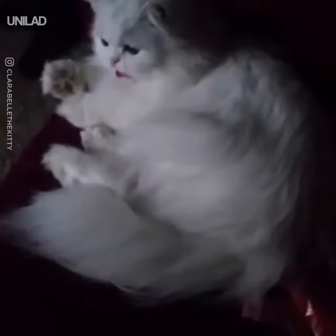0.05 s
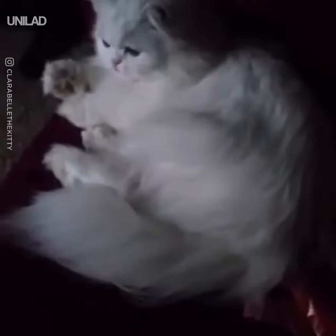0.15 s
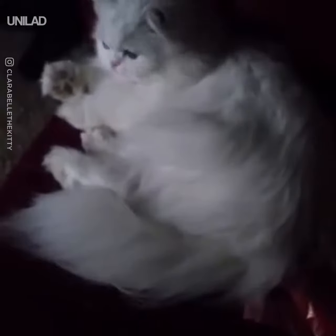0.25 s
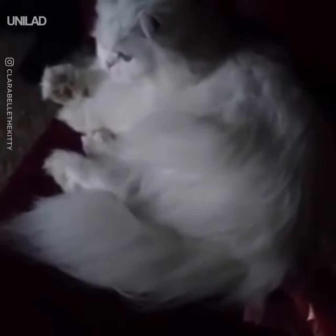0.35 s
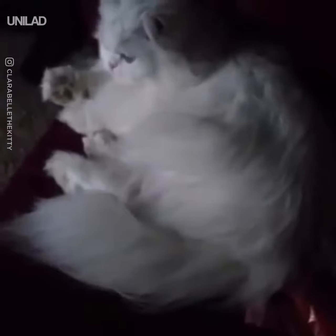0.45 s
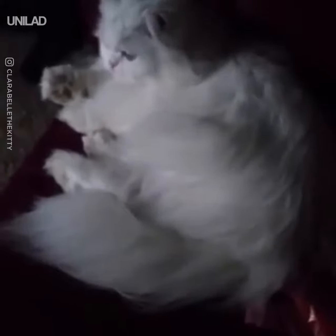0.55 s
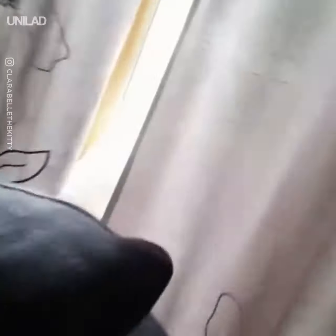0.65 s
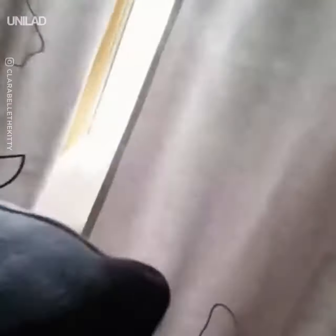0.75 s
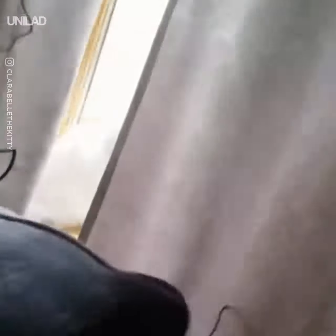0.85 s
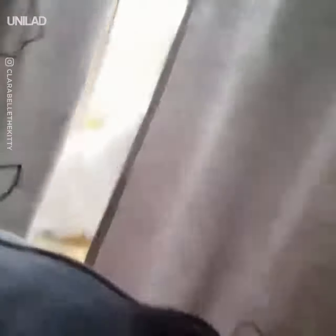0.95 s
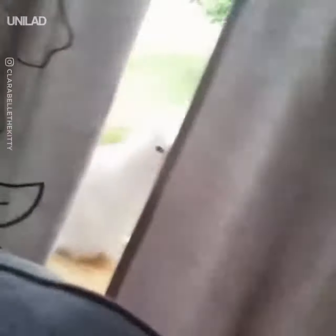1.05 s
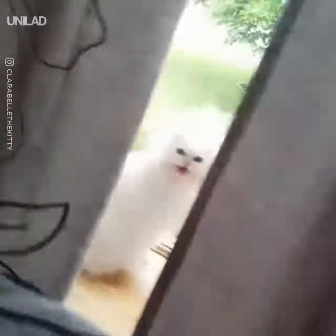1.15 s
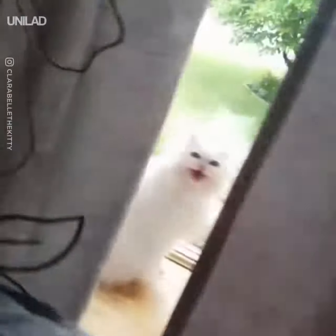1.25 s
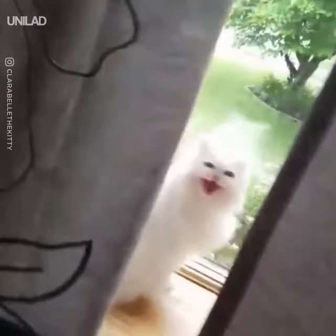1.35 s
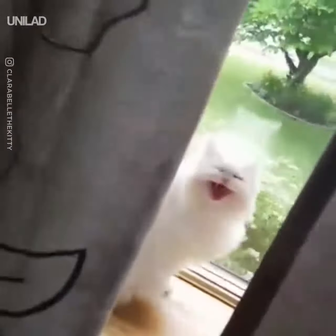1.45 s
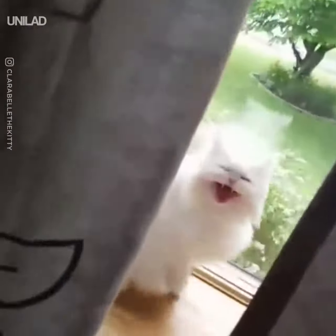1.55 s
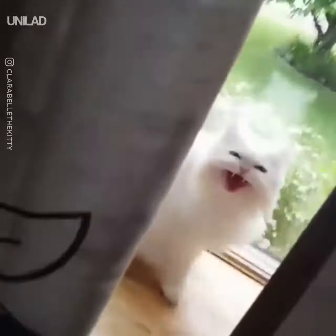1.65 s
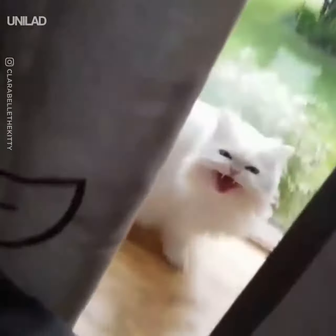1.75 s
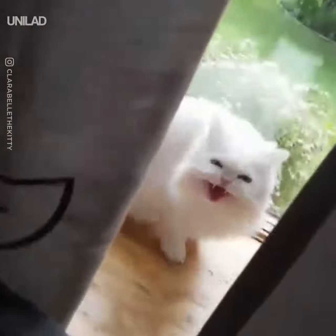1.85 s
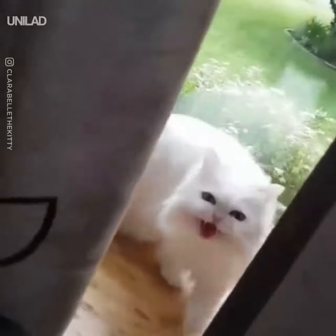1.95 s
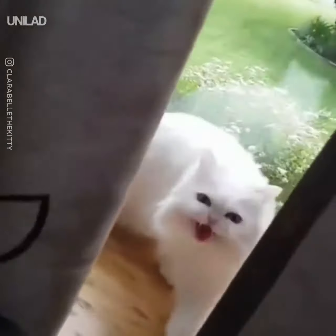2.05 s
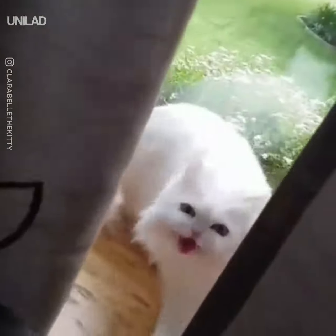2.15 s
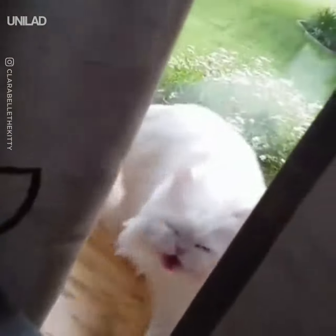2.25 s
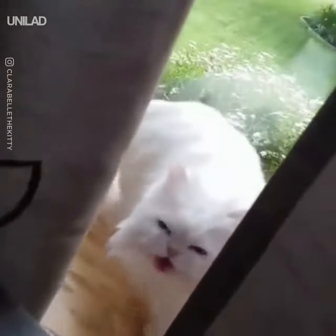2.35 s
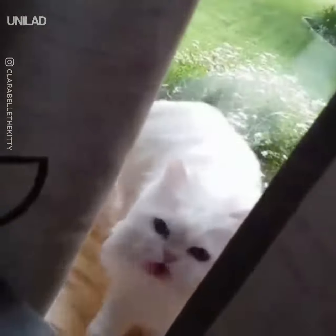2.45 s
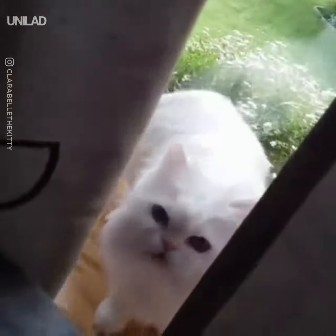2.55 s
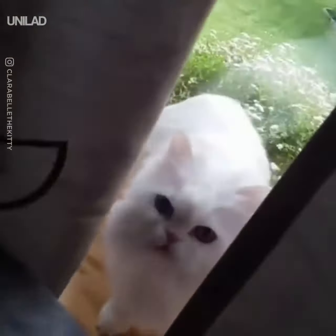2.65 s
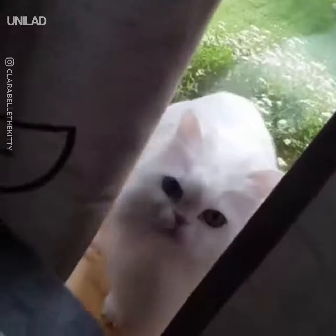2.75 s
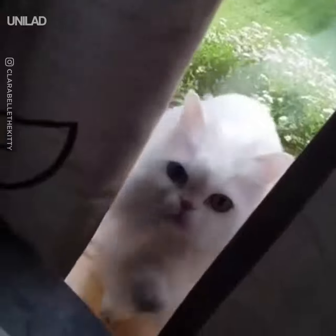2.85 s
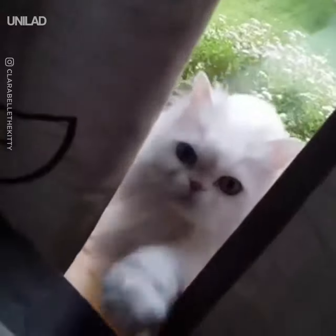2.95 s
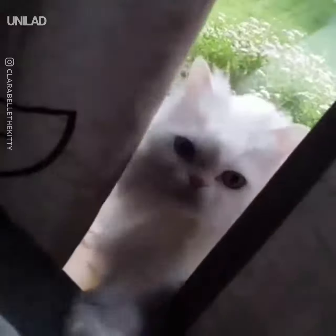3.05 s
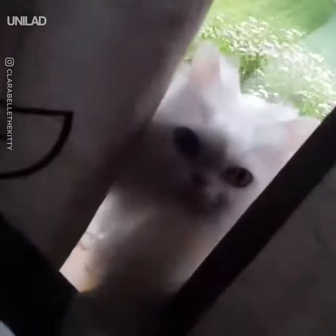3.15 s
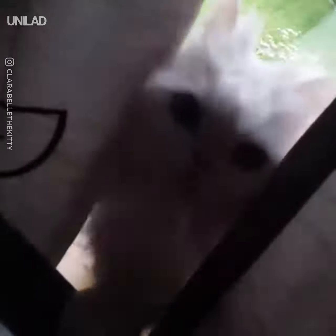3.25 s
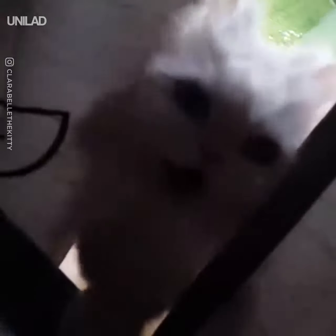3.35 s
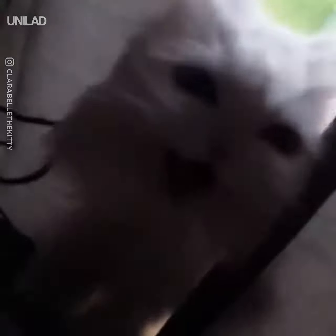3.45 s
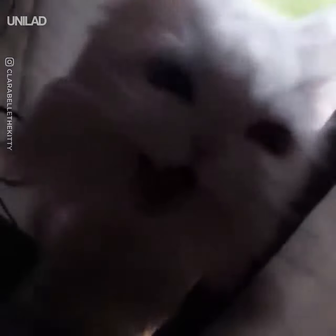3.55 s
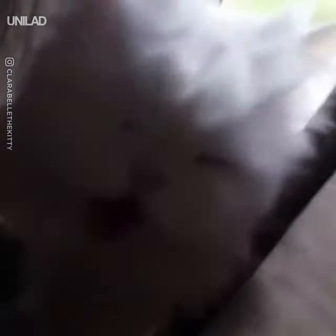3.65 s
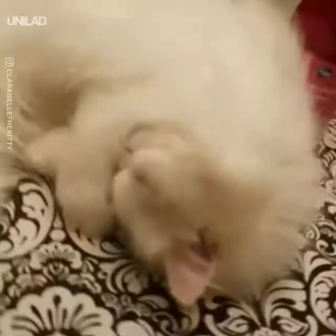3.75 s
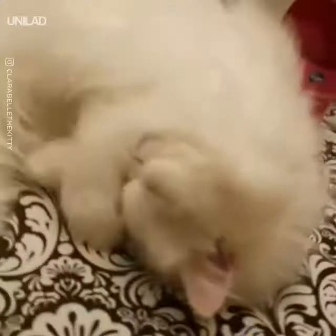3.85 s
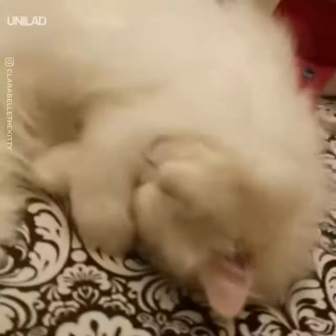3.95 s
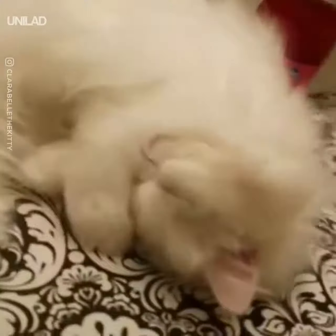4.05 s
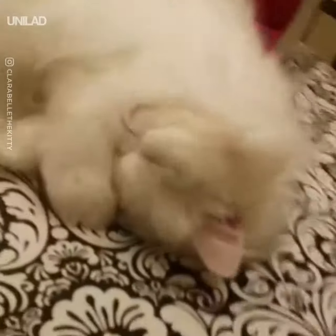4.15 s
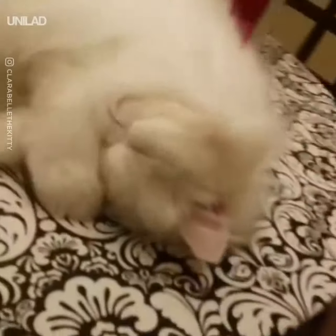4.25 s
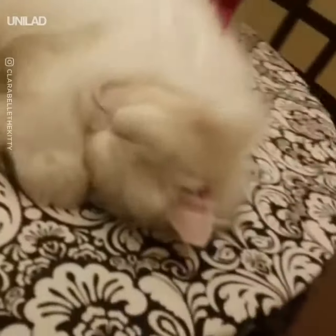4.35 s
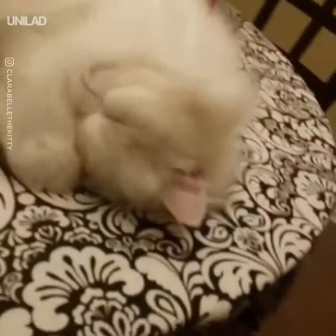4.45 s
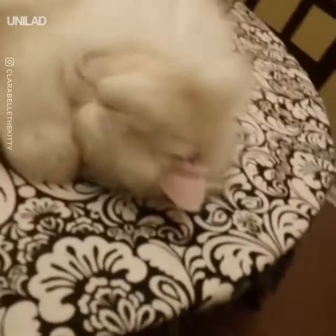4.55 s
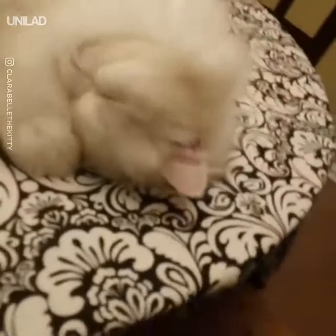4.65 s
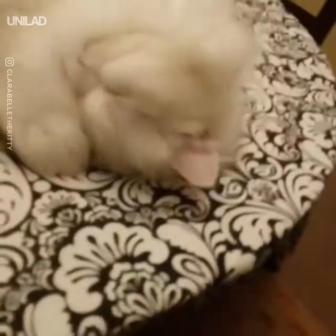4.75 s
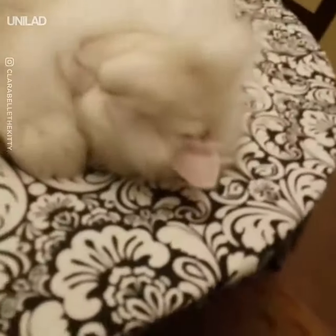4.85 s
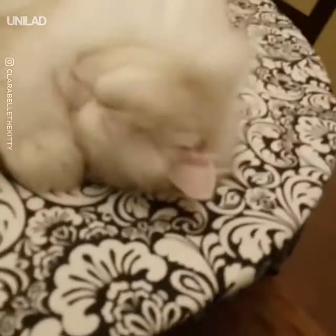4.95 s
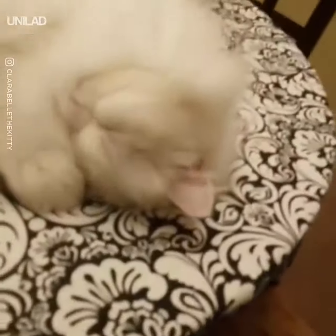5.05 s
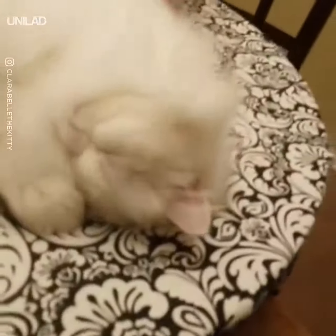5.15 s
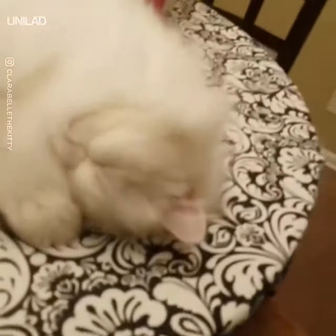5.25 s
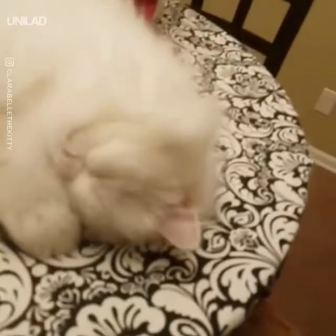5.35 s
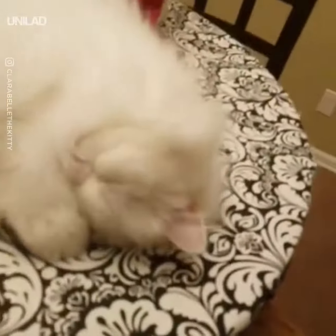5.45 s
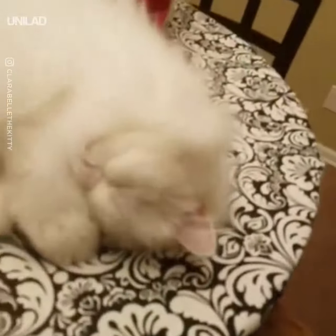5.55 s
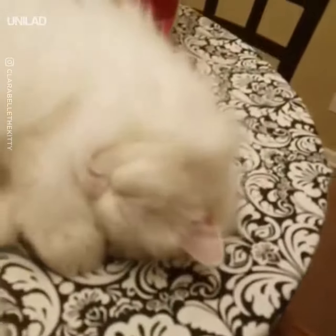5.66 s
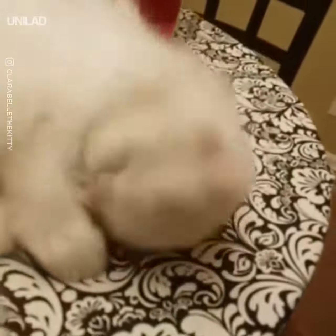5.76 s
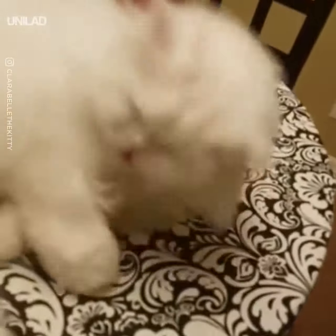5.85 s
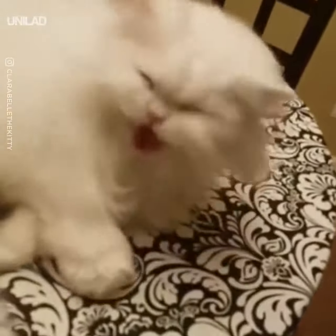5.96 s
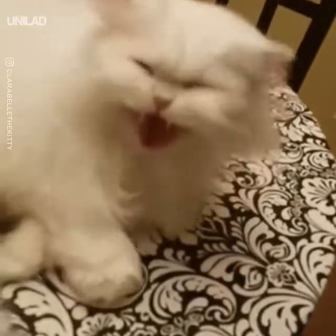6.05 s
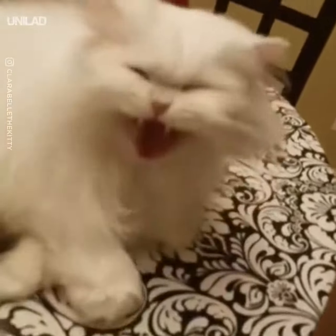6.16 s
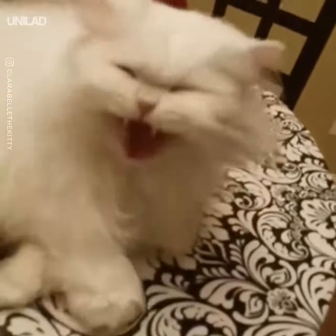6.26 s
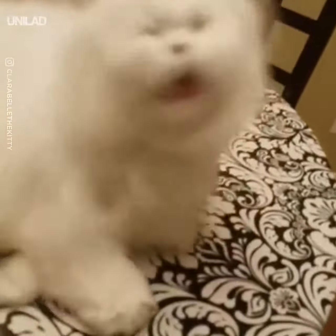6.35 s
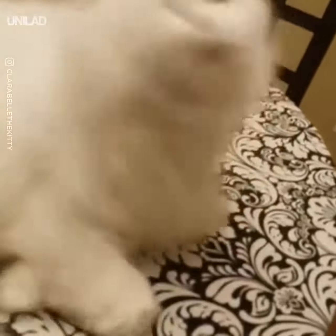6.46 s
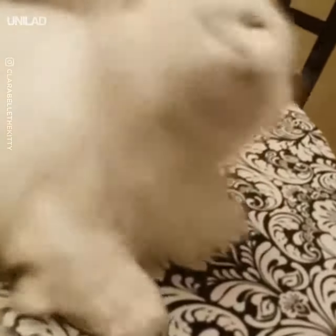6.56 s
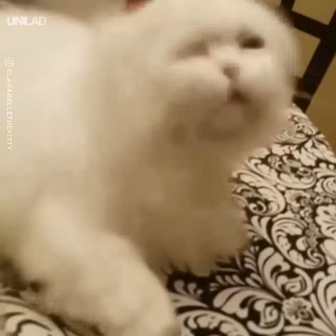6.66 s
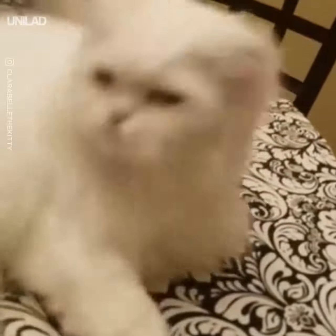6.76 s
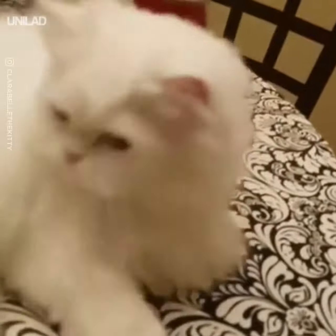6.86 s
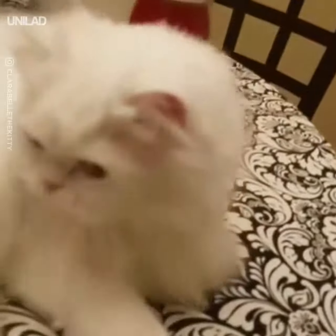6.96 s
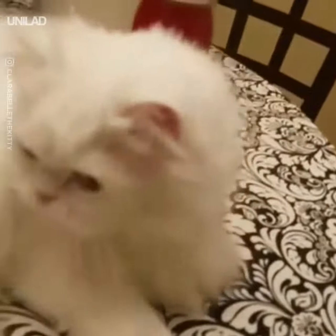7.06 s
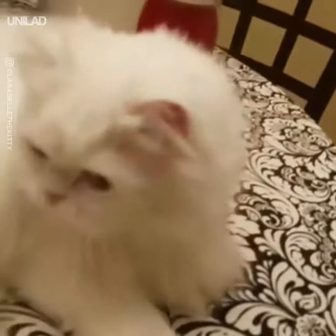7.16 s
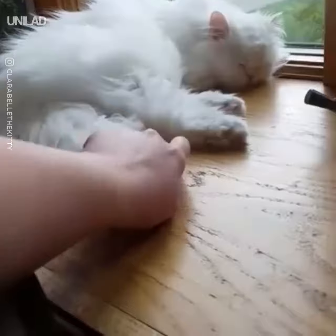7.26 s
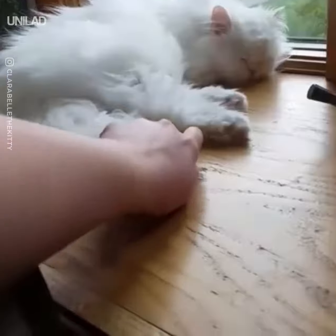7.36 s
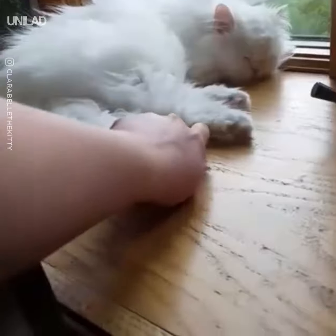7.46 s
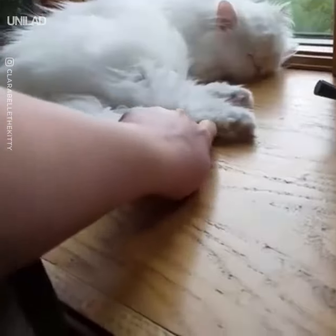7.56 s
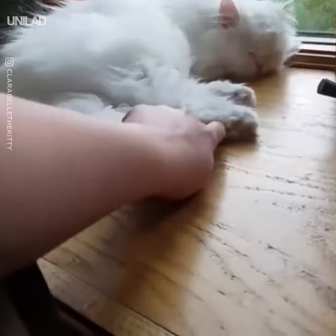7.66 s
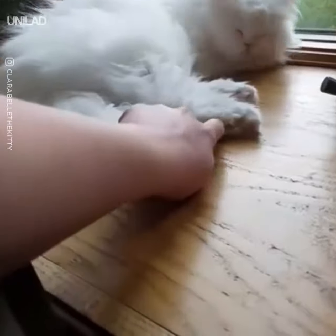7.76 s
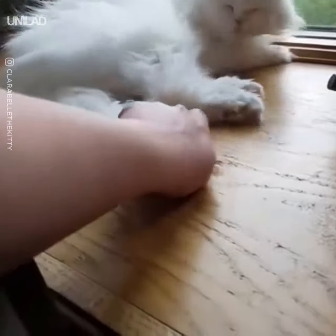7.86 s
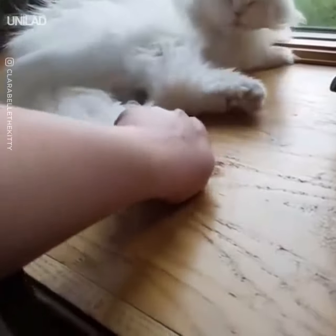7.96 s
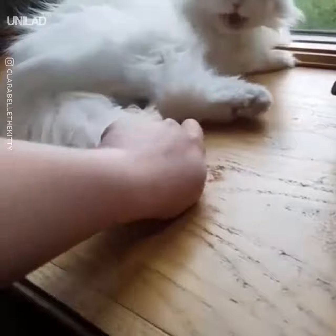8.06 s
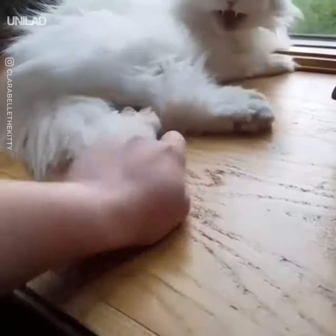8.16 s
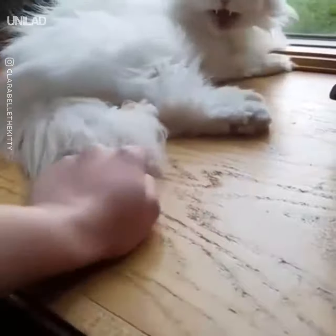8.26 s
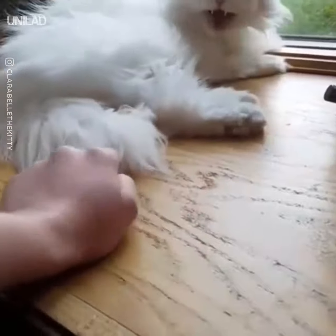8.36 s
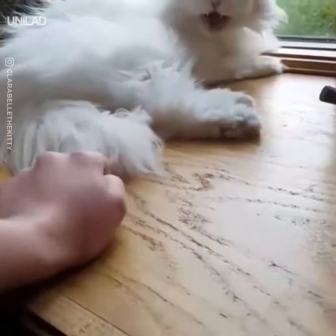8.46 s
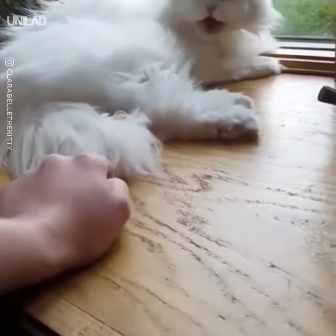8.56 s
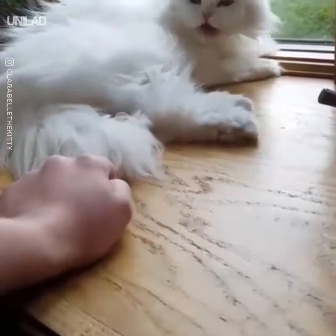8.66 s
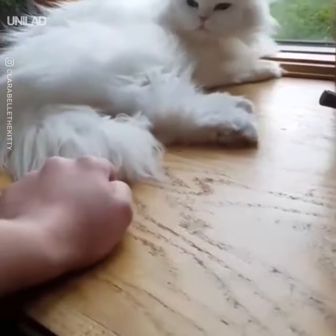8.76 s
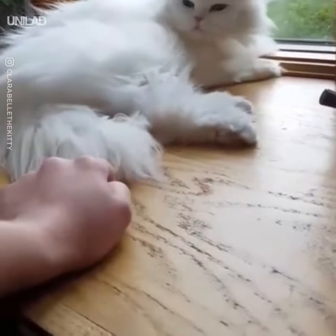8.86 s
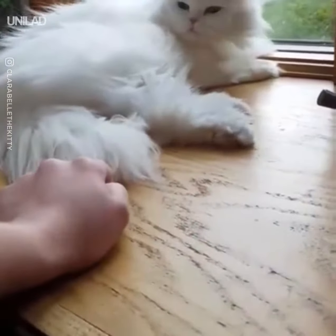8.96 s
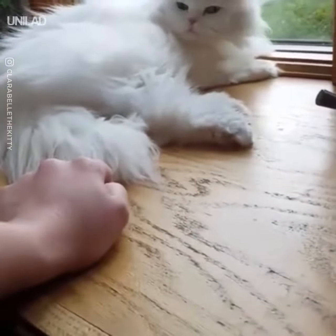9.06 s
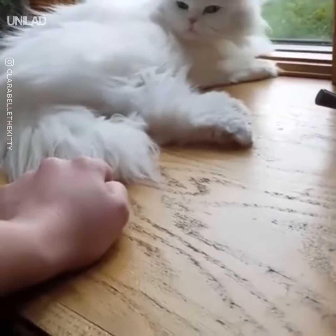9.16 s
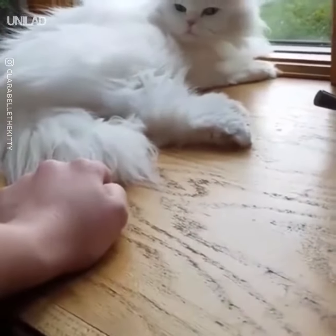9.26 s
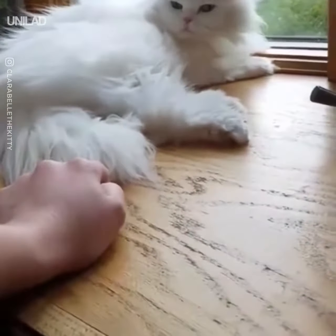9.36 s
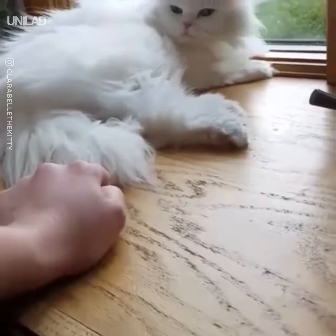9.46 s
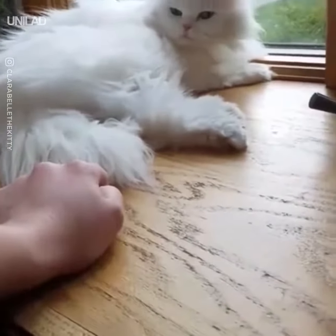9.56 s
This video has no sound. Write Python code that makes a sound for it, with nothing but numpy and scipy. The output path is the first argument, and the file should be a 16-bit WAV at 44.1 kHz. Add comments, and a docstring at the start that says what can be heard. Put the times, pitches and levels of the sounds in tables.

```python
"""A cat meows five times in four short indoor scenes, cut one after the other.
Each meow is a stack of harmonics shaped by mouth and throat; its treble follows loudness and pitch.
A small faint cry leads into the fourth meow. Rustles and scuffs are shaped noise, taps are short
noise bursts, and two squeaks are gliding tones.
Each scene has its own room noise; the first adds a low rumble, the second a gliding low drone."""
import sys
import numpy as np
from scipy import signal
from scipy.fft import rfft, irfft, next_fast_len
from scipy.io import wavfile
from scipy.ndimage import uniform_filter1d, map_coordinates

SR = 44100
rng = np.random.default_rng(int(sys.argv[2]) if len(sys.argv) > 2 else 0)


def dump(signal):
    """Clip the signal to [-1, 1] and save it as 16-bit WAV at the path in sys.argv[1]."""
    limited = np.clip(np.atleast_2d(signal).T, -1, 1)
    pcm = np.round(limited * 32767).astype(np.int16)
    wavfile.write(sys.argv[1], SR, pcm)


N = 423356
TIME = np.arange(N) / SR  # seconds

# when each scene plays: (start [s], end [s])
SCENES = [(0, .83), (.865, 4.006), (4.045, 7.504), (7.544, 9.6)]
# colour of scraping and of stroked fur: (frequency [Hz], relative level [dB])
SCRAPE_COLOUR = [(410, -15), (700, -3.5), (1230, -14), (1550, -2.5), (1810, -21), (2590, 2), (3660, -6),
                 (4110, -3.5), (5380, -17.5), (6950, -13), (8870, -30.5), (15000, -43)]
# colour of the third room's noise, also of the faint noise under everything:
# (frequency [Hz], relative level [dB])
TABLE_AIR = [(15, -59), (25, -27), (176, -15.5), (293, -6), (326, -10), (856, -26), (952, -28.5),
             (1420, -27.5), (2300, -31), (15000, -43)]


def amp(db):
    """Turn decibels into a gain."""
    return 10 ** (np.asarray(db) / 20)


def unit(x):
    """Scale to an average (rms) level of 1."""
    return x / np.sqrt(np.mean(x ** 2) + 1e-20)


def along(points, hz):
    """Read a curve of (frequency, value) points on a logarithmic frequency axis."""
    point_hz, values = np.transpose(points)
    return np.interp(np.log(hz + 1), np.log(point_hz), values)


def curves(rows, t=TIME):
    """Read each column after the time as a curve at the times t."""
    seconds, *columns = np.transpose(rows)
    return [np.interp(t, seconds, column) for column in columns]


def window(start, end, fade, t=TIME):
    """1 from start to end, with straight fades to 0 outside; all in seconds."""
    return np.clip(1 + np.minimum(t - start, end - t) / fade, 0, 1)


def wobble(rate, size=N):
    """A smooth random curve with rate random points a second."""
    points = rng.standard_normal(int(size * rate / SR) + 4)
    return map_coordinates(points, [np.arange(size) * rate / SR])


def filtered(x, response):
    """Pass x through a gain that depends on frequency."""
    m = next_fast_len(len(x) + 8192)
    spectrum = rfft(x, m) * response(np.fft.rfftfreq(m, 1 / SR))
    return irfft(spectrum, m)[:len(x)]


def noise(colour):
    """Random noise with the given frequency colour and an rms level of 1."""
    return unit(filtered(rng.standard_normal(N), lambda hz: amp(along(colour, hz))))


def cat():
    """Five meows and a small cry; each has its own room sound, but the close one is dry and breaks off."""
    # voice through each call:
    # (time [s], pitch [Hz], level of harmonics 2 and 3 together [dB], mouth resonance [Hz])
    sofa_call = [(0, 819, -33, 2660), (.027, 890, -33, 2530), (.05, 843.4, -30.5, 2670),
                 (.156, 867, -26, 2700), (.263, 885, -31.5, 2550), (.317, 816, -38, 3140),
                 (.39, 859, -38.5, 3000), (.503, 825.3, -43, 1760), (.55, 850, -54, 1000),
                 (.574, 880, -72, 1000)]
    door_call = [(1.17, 722.7, -72, 2000), (1.215, 698, -67, 2210), (1.262, 763, -44, 2440),
                 (1.361, 822, -45, 2300), (1.459, 1177, -42.5, 2570), (1.58, 1197, -27, 2650),
                 (1.625, 1168, -25.5, 2600), (1.86, 1167, -22, 2600), (1.9, 1150, -19.5, 2725),
                 (2.048, 1128, -22, 2650), (2.112, 997, -18.5, 2650), (2.168, 964, -21, 2740),
                 (2.195, 945.6, -16, 2930), (2.34, 914.7, -15.5, 2900), (2.56, 878, -21.5, 2450),
                 (2.65, 815, -23.5, 2150), (2.722, 712, -23.5, 1650), (2.76, 687, -60, 1550)]
    near_call = [(3.33, 509, -73, 1792), (3.435, 662, -48.5, 1500), (3.452, 654, -36, 2300),
                 (3.488, 845, -35, 2550), (3.522, 1002, -36.5, 2560), (3.589, 1039, -27.5, 2600),
                 (3.718, 979.7, -22.5, 2506), (3.89, 875, -16, 2480), (4.006, 786.7, -23.5, 1880)]
    table_call = [(5.96, 634, -65.5, 1580), (6.068, 706, -56.5, 1800), (6.089, 837, -34.5, 2540),
                  (6.133, 999, -30.5, 2680), (6.185, 1104, -30, 2950), (6.274, 1079, -29.5, 2720),
                  (6.35, 1128, -21.5, 2940), (6.461, 1142, -22.5, 2910), (6.487, 917, -23.5, 2460),
                  (6.507, 844, -19.5, 1750), (6.525, 791, -45, 1900), (6.58, 683, -54, 1500),
                  (6.66, 683, -56, 1520), (6.74, 610, -68, 1420)]
    mew_call = [(5.87, 800, -80, 1800), (5.895, 793, -72, 1810), (5.94, 720, -72, 1700)]
    sill_call = [(8.2, 1032, -69, 2200), (8.315, 1383, -42, 3600), (8.354, 1444, -43.5, 3770),
                 (8.49, 1418, -38.5, 3340), (8.518, 1232, -42, 2930), (8.654, 1155, -43, 2580),
                 (8.706, 1015, -42.5, 2334), (8.826, 944, -42, 2260), (8.905, 787, -62.5, 1680)]
    # throat colour of the upper harmonics: (frequency [Hz], relative level [dB])
    sofa_throat = [(3300, 9.5), (4300, -7.5), (5800, -13), (6900, -1), (7900, 4), (10000, 12),
                   (12000, -8.5)]
    door_throat = [(3600, 2.5), (4700, 5.5), (5800, -3), (6400, -22.5), (7200, -8.5), (8200, -20),
                   (9000, -25.5), (14500, -20.5)]
    near_throat = [(3200, 7.5), (4100, 0), (5000, 4.5), (5700, -17.5), (6400, -12), (7100, -6.5),
                   (8000, -14), (10500, -8.5), (14500, -27.5)]
    table_throat = [(3200, 4), (4000, -9), (4550, -2), (5500, -11.5), (6800, -10.5), (7900, -8.5),
                    (11500, -15.5)]
    sill_throat = [(3200, 7), (4000, 17), (4900, 1.5), (5700, -7.5), (7200, -6), (8000, -11), (14500, -10)]
    # brightness of each voice, before a small trim:
    # (treble of a plain call [dB], brightest pitch [Hz], loss away from that pitch [dB per octave])
    sofa_treble = (-45.5, 868, 39)
    door_treble = (-33.5, 1165, 32.5)
    near_treble = (-35.5, 1007, 61)
    table_treble = (-29.5, 1140, 33)
    mew_treble = (-68, 800, 33)
    sill_treble = (-39.5, 1120, 29)

    sofa = meow(sofa_call, sofa_throat, sofa_treble, fundamental_db=-42.5, jitter=0.0036,
                rasp=0.005, skirt_db=-56.5, hiss_db=-42, middle_db=3.0)
    door = meow(door_call, door_throat, door_treble, fundamental_db=-43.5, jitter=0.0026,
                rasp=0.0046, skirt_db=-55, hiss_db=-40, middle_db=-26.0)
    near = meow(near_call, near_throat, near_treble, fundamental_db=-39.0, jitter=0.0016,
                rasp=0.0039, skirt_db=-51.0, hiss_db=-40, middle_db=-14)
    table = meow(table_call, table_throat, table_treble, fundamental_db=-43.5, jitter=0.0012,
                 rasp=0.0097, skirt_db=-43, hiss_db=-35, middle_db=-4)
    mew = meow(mew_call, table_throat, mew_treble, fundamental_db=-46.5, jitter=0.004,
               rasp=0.008, skirt_db=-28, hiss_db=-30.5, middle_db=-7)
    sill = meow(sill_call, sill_throat, sill_treble, fundamental_db=-45.0, jitter=0.0014,
                rasp=0.0026, skirt_db=-58, hiss_db=-37.5, middle_db=-12)

    far = room(sofa, walls_db=-9.5, tail_db=-14) + room(door, walls_db=-10.5, tail_db=-33.5)
    late = room(table + mew, walls_db=-12, tail_db=-16.5) + room(sill, walls_db=-9.5, tail_db=-23)
    return far + near + late


def meow(rows, throat, treble, fundamental_db, jitter, rasp, skirt_db, hiss_db, middle_db, count=18):
    """Harmonics of the vocal folds; the upper ones slide through the fixed resonances of the throat."""
    # the microphone hears the top of the voice much more weakly: (frequency [Hz], gain [dB])
    treble_step = [(8150, -2), (8500, -20)]
    gate = window(rows[0][0], rows[-1][0], 0.0079)
    on = gate > 0
    size = on.sum()
    pitch, level_db, mouth_hz = curves(rows, TIME[on])
    low_db, bright_db = voice_levels(pitch, level_db, mouth_hz, fundamental_db, treble)
    pitch = uniform_filter1d(pitch, 400, mode="nearest")

    # the folds beat less evenly while the pitch slides fast and when the voice is barely on
    slide = np.clip(np.abs(np.gradient(np.log(pitch))) * SR / 5, 0, 1)
    weak = np.clip((-42.0 - np.max(low_db, axis=0)) / 12, 0, 1)
    slow_jitter = (jitter + 0.0098 * weak) * (wobble(24, size) + wobble(70, size))
    fast_jitter = (0.0018 + rasp * slide + 0.019 * weak) * wobble(500, size)
    pitch = pitch * (1 + slow_jitter + fast_jitter)
    k = np.arange(1, count + 1)[:, None]  # harmonic numbers
    phase = 2 * np.pi * k * np.cumsum(pitch) / SR

    # as the pitch sags the mouth narrows, which changes the middle of the treble (negative = hollow)
    upper_hz = k[3:] * pitch
    narrow = np.clip((1080 - pitch) / 170, 0, 1)
    middle = middle_db * narrow * np.exp(-((upper_hz - 4950) / 1050) ** 2)
    upper = amp(along(throat, upper_hz) + middle + along(treble_step, upper_hz))
    upper *= upper_hz < SR / 2
    # the harmonics above about 3.4 kHz together set the treble level
    high = np.clip((upper_hz - 3400) / 500, 0, 1)
    upper *= amp(bright_db - 1.0 - 10 * weak) / np.sqrt(np.sum(high * upper ** 2, axis=0))
    # the upper harmonics swell and fade one by one as the head moves
    drift_db, drift_rate = 1.5, 14  # rate in random points per second
    upper *= amp(drift_db * np.array([wobble(drift_rate, size) for _ in upper]))

    shimmer = amp(0.5 * np.minimum(k, 5) * np.array([wobble(35, size) for _ in k]))
    # fast slides break up the harmonics
    creak = amp(3.8 * slide * np.array([wobble(160, size) for _ in k]))
    gains = np.vstack([amp(low_db), upper]) * shimmer * creak

    # turbulence at the folds spreads a skirt of noise round each harmonic, most round the high ones
    skirt = np.array([wobble(800, size) * np.cos(p) + wobble(800, size) * np.sin(p) for p in phase])
    creak_db = -12.5  # extra skirt when the voice is barely on
    skirt *= amp(skirt_db) * np.minimum(k, 5) ** 1.3 + amp(creak_db) * weak

    # air hisses through the open mouth, swelling once in every cycle, most of all in the slides
    hiss = noise([(1900, -29.0), (2700, -1), (4000, 0.5), (8150, -0.5), (8500, -25.5)])[on]
    hiss = hiss * (1 + 0.54 * np.cos(phase[0])) * amp(2.2 * wobble(22, size))
    hiss_gain = amp(hiss_db - 3.5 + 0.55 * bright_db + 9 * slide - 5.3 * weak)

    voice = np.zeros(N)
    voice[on] = np.sqrt(2) * np.sum(gains * (np.sin(phase) + skirt), axis=0) + hiss_gain * hiss
    return voice * gate


def voice_levels(pitch, level_db, mouth_hz, fundamental_db, treble):
    """Levels of harmonics 1 to 3 and the treble; the mouth favours the nearer of harmonics 2 and 3."""
    mouth_width_hz = 356  # half width of the mouth resonance
    mouth = 1 / (1 + ((np.outer([2, 3], pitch) - mouth_hz) / mouth_width_hz) ** 2)
    second, third = level_db + 20 * np.log10(mouth / np.linalg.norm(mouth, axis=0))

    treble_db, brightest_hz, loss_db = treble
    plain_db = -28.5  # level of a plain call
    effort_db = level_db - plain_db
    slack_db = loss_db * np.abs(np.log2(pitch / brightest_hz))
    # the fundamental swells as the mouth resonance sinks from its open place
    closing_db_per_hz, open_mouth_hz = 0.0043, 2600
    closing_db = closing_db_per_hz * np.maximum(open_mouth_hz - mouth_hz, 0)
    # gains in dB per dB of effort; the fundamental suffers a quarter of the treble's slack
    fundamental_grows, treble_grows, fundamental_slack = 0.44, 0.61, 0.25
    first = fundamental_db + fundamental_grows * effort_db + closing_db - fundamental_slack * slack_db
    return [first, second, third], treble_db + treble_grows * effort_db - slack_db


def room(x, walls_db, tail_db, count=8):
    """The direct sound, a few echoes off near surfaces and a short diffuse tail."""
    # how long the tail rings: (frequency [Hz], time to fall by 60 dB [s])
    ring_times = [(200, 0.89), (2000, 0.37), (14000, 0.25)]
    hz, t, z = signal.stft(rng.standard_normal(SR // 2), SR, nperseg=256)
    fading = z * amp(-60 * t / along(ring_times, hz)[:, None])
    tail = signal.istft(fading, SR, nperseg=256)[1]
    answer = amp(tail_db) * tail / np.linalg.norm(tail)
    delays = (rng.uniform(0.002, 0.022, count) * SR).astype(int)
    answer[delays] += amp(walls_db) * rng.choice([-1, 1], count) / np.sqrt(count)
    answer[0] += 1  # direct sound
    return signal.fftconvolve(x, answer)[:N]


def cloth():
    """Strokes of curtain, cloth and fur, each a rubbing noise with its own colour."""
    # strokes, level before level_db is added:
    # (time of the peak [s], level [dB], rise [s], fall [s])
    curtain_strokes = [(1.412, -51.5, 0.11, .26), (1.598, -56.5, .1, 0.15)]
    cloth_strokes = [(4.232, -60.5, 0.31, 0.89), (4.73, -61.5, .1, 0.5), (4.97, -59.5, 0.8, 0.28),
                     (5.225, -61, 0.034, 0.15)]
    fur_strokes = [(9.56, -60, 0.2, 0.22)]
    # colours: (frequency [Hz], relative level [dB])
    curtain_colour = [(47, -42), (80, -28.5), (173, -2.5), (334, -7.5), (545, -27.5), (650, -15),
                      (840, -42), (1430, -120)]
    cloth_colour = [(59, -39.5), (100, -12), (317, -3), (797, -10), (3460, -26), (10500, -38), (14100, -30),
                    (15000, -38)]
    curtain = rustle(curtain_strokes, curtain_colour, level_db=5)
    fabric = rustle(cloth_strokes, cloth_colour, level_db=3)
    return curtain + fabric + rustle(fur_strokes, SCRAPE_COLOUR, level_db=1)


def rustle(strokes, colour, level_db):
    """Each stroke swells and dies away; fibres catch and slip, so the rubbing comes in small clumps."""
    stroke_db = 22.5  # climb over the rise and drop over the fall
    levels = []
    for s, db, rise, fall in strokes:
        distance = np.maximum((s - TIME) / rise, (TIME - s) / fall)
        levels.append(db - stroke_db * distance)
    clumps = amp(2 * wobble(120))
    return amp(np.max(levels, axis=0) + level_db) * unit(noise(colour) * clumps)


def scuffs():
    """A brush against the furniture: a dull thud, then a short grainy scrape."""
    # (start [s], end [s], thud level [dB], scrape level [dB])
    brushes = [(7.457, 7.495, -47, -41), (9.404, 9.441, -36, -34.5)]
    # colour of the thud: (frequency [Hz], relative level [dB])
    thud_colour = [(29, -50), (50, -13), (293, -4.5), (372, -7), (548, -6), (714, -35), (1200, -25),
                   (1560, -39), (2640, -120)]
    thud = noise(thud_colour)
    scrape = unit(noise(SCRAPE_COLOUR) * amp(2.8 * wobble(350)))
    out = np.zeros(N)
    for start, end, thud_db, scrape_db in brushes:
        out += amp(thud_db) * thud * window(start, (start + end) / 2, 0.042) ** 2
        out += amp(scrape_db) * scrape * window(start + 0.012, end - 0.008, 0.042) ** 3
    return room(out, walls_db=-9.5, tail_db=-17)


def taps():
    """Small bumps, ticks and puffs: each is a noise burst in one band that dies away."""
    # level before the soft start:
    # (time [s], level [dB], centre [Hz], width [octaves], time to fall by 60 dB [s])
    knocks = [(2.742, -37.5, 1289, 0.64, 0.079), (5.222, -59.5, 2300, 0.84, .25),
              (6.028, -47.5, 7100, 0.84, 0.05), (6.561, -54, 139.7, 1.5, 1), (6.687, -48, 360, 0.61, .15),
              (6.78, -50.5, 880, 0.87, 0.13), (6.789, -36.5, 342, 0.16, 0.11),
              (6.837, -58, 2490, 0.89, 0.11), (8.171, -52.5, 3290, 0.76, 0.1),
              (9.325, -44, 9000, 0.66, 0.017)]
    out = np.zeros(N + SR)
    t = np.arange(SR // 3) / SR
    for s, db, centre_hz, octaves, t60 in knocks:
        def band(hz):
            return np.exp(-0.5 * (np.log2((hz + 1) / centre_hz) / octaves) ** 2)
        burst = unit(filtered(rng.standard_normal(len(t)), band))
        soft_start = 1 - np.exp(-20 * t / t60)
        out[round(s * SR):][:len(t)] += burst * amp(db - 60 * t / t60) * soft_start
    return out[:N]


def squeaks():
    """Two faint squeaks, one low and one high, each a single gliding tone."""
    # level before level_db is added: (time [s], pitch [Hz], level [dB])
    low_squeak = [(2.218, 420, -74.5), (2.232, 440, -37), (2.27, 468, -39), (2.335, 560, -74)]
    high_squeak = [(9.535, 2580, -70), (9.552, 3010, -52), (9.575, 2480, -69), (9.598, 2460, -68)]
    low = tone(low_squeak, level_db=-4, waver=0.007, flutter_db=-4.5)
    return low + tone(high_squeak, level_db=4, waver=0.03, flutter_db=6)


def drone():
    """A low tone that glides and wavers through the second scene."""
    # level before level_db is added: (time [s], pitch [Hz], level [dB])
    hum = [(0.87, 110.6, -68), (1.28, 109.7, -56.5), (1.44, 121, -65.5), (2.34, 121, -66.5),
           (3.21, 83.8, -75.5), (3.39, 82.7, -64), (3.52, 68, -59), (4.0, 71.1, -50.5)]
    return tone(hum, level_db=-3, waver=0.046, flutter_db=4.5)


def tone(rows, level_db, waver, flutter_db):
    """A single gliding sine, slightly unsteady in pitch and level."""
    hz, db = curves(rows)
    phase = 2 * np.pi * np.cumsum(hz * (1 + waver * wobble(73))) / SR
    level = np.sqrt(2) * amp(db + level_db + flutter_db * wobble(25))
    return level * np.sin(phase) * window(rows[0][0], rows[-1][0], 0.0048)


def air():
    """Noise of each room; the hiss by the door slowly fades and a low rumble lies under the first meow."""
    # colours of the room noise: (frequency [Hz], relative level [dB])
    sofa_air = [(15, -45), (25, -16), (109, -7.5), (163, -18), (856, -34), (15000, -48)]
    door_air = [(30, -7.5), (120, 0.5), (220, -5), (360, -4.5), (700, -18.5), (2000, -18.5), (8000, -32),
                (14000, -31)]
    sill_air = [(15, -55.5), (25, -25.5), (121, 0), (383, -9), (637, -22), (749, -16.5), (1030, -31.5),
                (1720, -29), (4750, -46.5), (12400, -48), (15000, -52)]
    door_db = -62 - 2.5 * TIME
    beds = (amp(-75.5) * noise(sofa_air), amp(door_db) * noise(door_air),
            amp(-67.5) * noise(TABLE_AIR), amp(-48.5) * noise(sill_air))
    floor = sum(bed * window(start, end, 0.0027) for bed, (start, end) in zip(beds, SCENES))
    # the rumble holds for 0.63 s, then drops by 153 dB per second
    rumble_db = -61 - 153 * np.maximum(TIME - 0.63, 0)
    rumble = amp(rumble_db) * noise(sofa_air) * window(*SCENES[0], 0.003)
    return floor * amp(1.2 * wobble(8)) + rumble


def scene():
    """All sources, dropping to a very faint noise for a moment between the scenes."""
    sources = cat() + cloth() + scuffs() + taps() + squeaks() + drone() + air()
    cuts = np.max([window(start, end, 0.00022) for start, end in SCENES], axis=0)
    return (sources * cuts + amp(-79) * noise(TABLE_AIR))[None]


def record(dry):
    """The recorder cuts steeply above its band limit."""
    top_hz = 14900  # gain is one half here
    return filtered(dry[0], lambda hz: 1 / (1 + (hz / top_hz) ** 80))[None]


dry = scene()
out = record(dry)
dump(out)
```